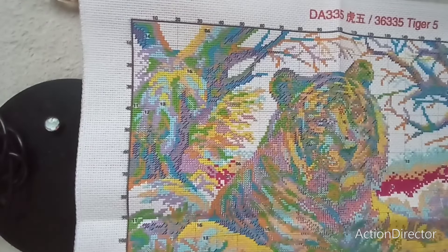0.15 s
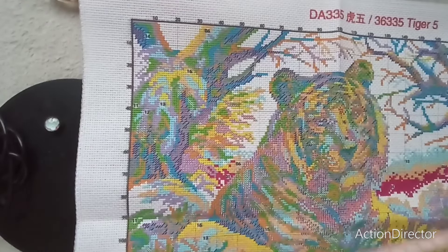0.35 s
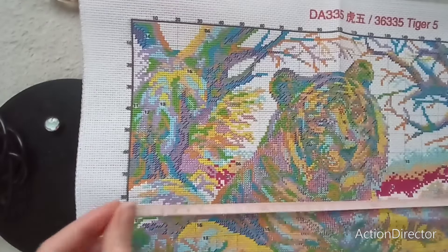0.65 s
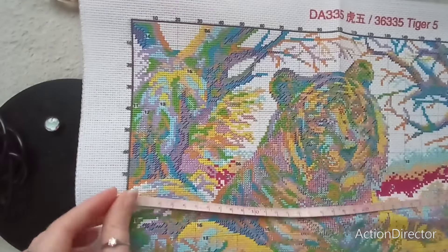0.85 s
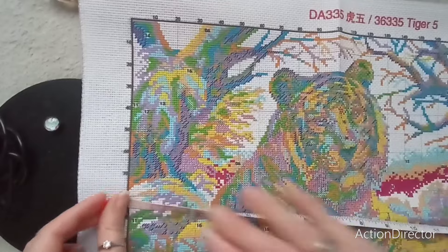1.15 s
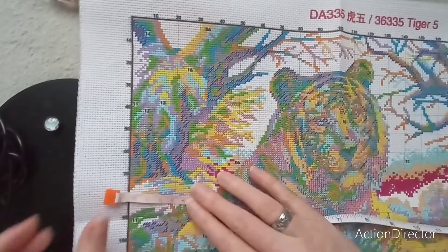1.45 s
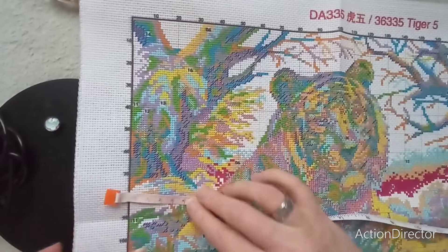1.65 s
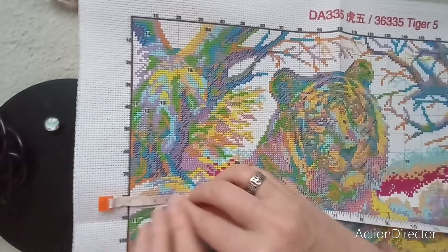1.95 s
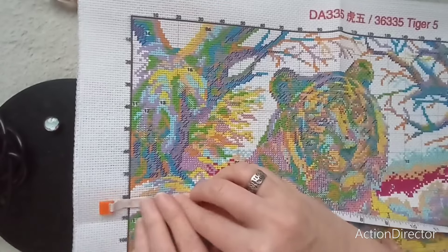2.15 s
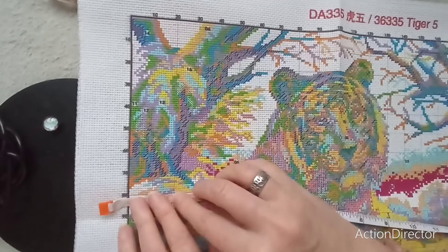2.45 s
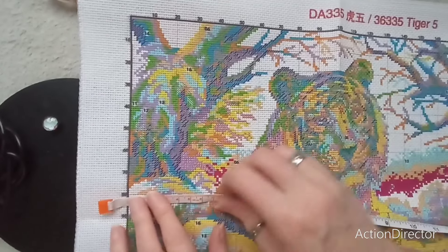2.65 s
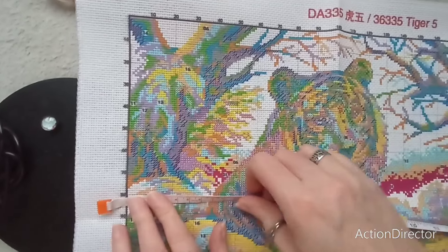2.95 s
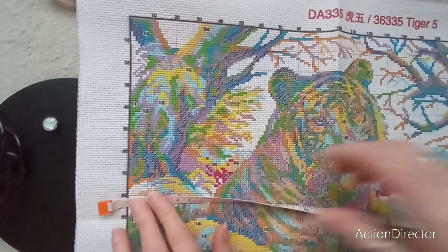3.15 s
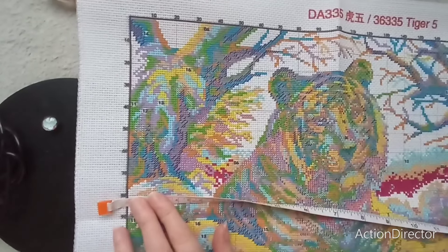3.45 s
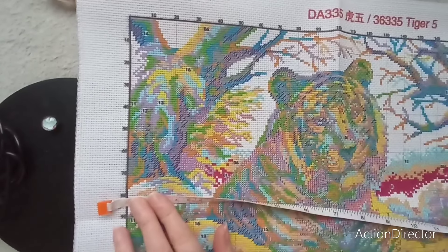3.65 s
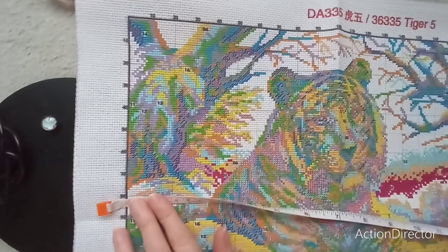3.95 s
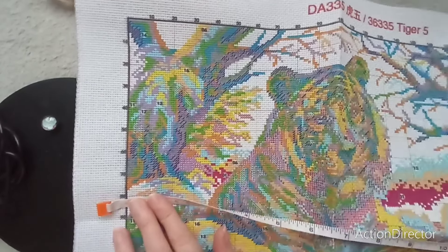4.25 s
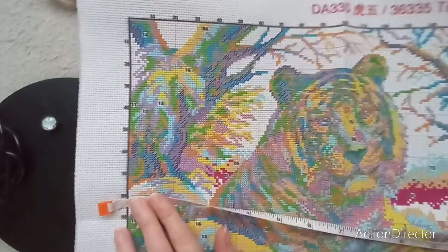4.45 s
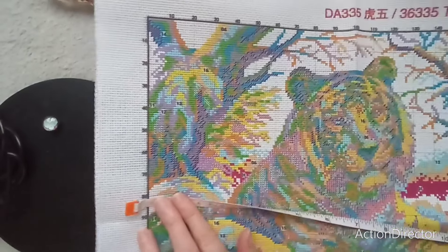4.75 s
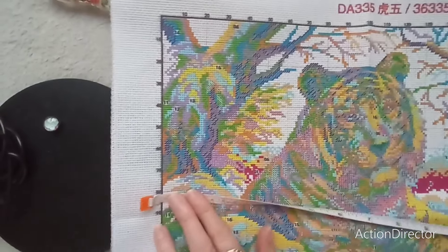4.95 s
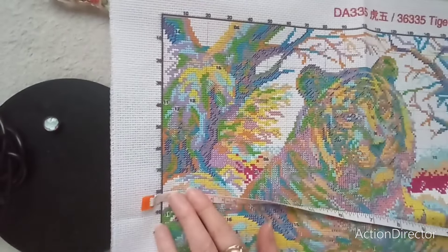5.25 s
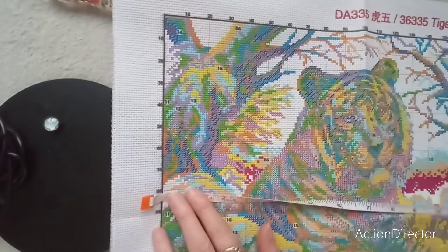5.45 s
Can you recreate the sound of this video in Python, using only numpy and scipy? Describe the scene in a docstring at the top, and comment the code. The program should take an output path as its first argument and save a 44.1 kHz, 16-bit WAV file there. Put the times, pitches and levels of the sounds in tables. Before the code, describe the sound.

Close to a stereo microphone in a small quiet room, a flexible tape measure is pulled out at the right, hissing and cracking sharply for half a second. Soft finger pats and a click follow as it lands on stiff canvas, then faint rubbing. After a near-quiet stretch come more pats, a brief rasping drag, a hard knock at the left and a few last dry clicks.

```python
"""Tape measure on embroidery canvas

A small quiet room, close to a camera with two microphones. A plastic tape is drawn out at the right:
friction hiss, with a damped flap and a cracking burst as each kink flips. It is laid on stiff canvas on
a table, where fingers pat (damped modes), smooth, scrape and drag (filtered random slips), threads click
and tick (short noise bursts), and something small and hard knocks at the left. Low rumble and hiss lie
beneath, and decaying noise gives the room's answer."""
import sys
import numpy as np
from scipy import signal
from scipy.fft import rfft, irfft, next_fast_len
from scipy.io import wavfile
from scipy.ndimage import uniform_filter1d, map_coordinates

SR = 44100
rng = np.random.default_rng(int(sys.argv[2]) if len(sys.argv) > 2 else 0)


def materialize(psi):
    """Save the field psi as 16-bit PCM at rate SR to the path in sys.argv[1].

    A 1-D psi becomes a single channel; in a 2-D psi each row is a channel.
    """
    bounded = np.clip(np.atleast_2d(psi).T, -1, 1)
    quanta = np.round(bounded * 32767).astype(np.int16)
    wavfile.write(sys.argv[1], SR, quanta)


N = 246519

# All levels are relative; spectra are densities per Hz.
# Room tone. Each row: frequency in Hz, level in dB.
ROOM_TONE_SPECTRUM = [(25, -21), (45, -18), (85, -0.5), (200, 1.5), (400, -5.5), (800, -13), (2000, -18.5),
                      (3400, -20), (3900, -25), (9500, -31), (11300, -29), (12050, -14), (12700, -25.5),
                      (15000, -26)]
# Left-right likeness of the room tone. Each row: frequency in Hz, correlation from 0 to 1.
ROOM_TONE_LIKENESS = [(60, 0.38), (300, 0.31), (900, 0.061), (2000, 0)]
# Decay of the room. Each row: frequency in Hz, time to fall 60 dB in seconds.
ROOM_DECAY = [(150, 0.27), (1000, 0.29), (5000, 0.32), (14000, 0.22)]
# The camera's body shading sound from the right. Each row: frequency in Hz, left-right difference in dB.
RIGHT_SHADE = [(200, -4.5), (700, -4), (1300, -11.5), (2400, -3.5), (4400, -5), (8000, -16.5),
               (10500, -1.5), (12500, 7.5), (15000, -7)]
# Where the hands work. Each row: time in seconds, left-right difference in dB.
HAND_PLACES = [(1.05, -4.5), (1.398, 2), (2.7, 2.5), (3.602, -6.5), (4.3, -4.5), (4.9, 0), (5.5, -6)]

# Something small and hard knocking at the left. Each row: start in seconds, level in dB.
KNOCKS = [(4.6047, -25.5), (4.631, -10.5), (4.668, -26.5)]
# Spectrum of its click and rattle. Each row: frequency in Hz, level in dB.
KNOCK_SPECTRUM = [(120, -26), (550, 0), (1000, 6), (1200, -1.5), (1420, 2), (1950, -8.5), (3200, -1),
                  (4800, -12), (9500, -47), (12500, -2.5), (15000, -14.5)]
# Single threads slipping off a nail. Each row: start in seconds, level in dB.
THREAD_TICKS = [(0.142, -19.5), (1.785, -29), (1.806, -30), (2.0814, -28), (3.5535, -28.5)]
# Spectrum of these ticks. Each row: frequency in Hz, level in dB.
TICK_SPECTRUM = [(1500, -18), (9500, -11.5), (12500, 5.5), (15500, 1)]
# Stiff threads and tape edges clicking by themselves. Each row: start in seconds, level in dB.
CRINKLES = [(0.1335, -25), (5.1927, -33), (5.206, -23), (5.5317, -25.5), (5.545, -23.5)]
# Spectrum of these clicks. Each row: frequency in Hz, level in dB.
CLICK_SPECTRUM = [(300, 9), (1200, -7.5), (3500, 5), (7000, 7), (9500, 0), (12500, 3.5), (15500, -21)]
# A nail scraping across the weave. Each row: middle in seconds, half length in seconds, level in dB.
SCRAPES = [(1.064, .002, -49), (1.79, .007, -54), (1.807, 0.0045, -52), (1.925, 0.033, -66),
           (2.217, 0.009, -53), (2.692, 0.052, -61.5), (4.386, 0.0028, -46.5)]
# Spectrum of the scrapes. Each row: frequency in Hz, level in dB.
SCRAPE_SPECTRUM = [(200, 2), (600, 0), (1050, 0), (1700, -6), (2600, -5), (5000, -15.5), (15000, -8.5)]

# Fingers and tape landing. Each row: start in seconds, pat in dB, pitch in Hz, click in dB.
TAPS = [(0.7817, -50, 233, -32.5), (0.872, -37, 260, -32.5), (.935, -42.5, 213, -54),
        (1.055, -41, 310, -36), (1.064, -46, 370, -52), (1.0717, -36, 104, -19.5), (1.083, -48, 330, -58),
        (1.1, -46, 260, -40), (1.403, -47, 212, -47), (3.8358, -40, 275, -36), (3.853, -46, 290, -44),
        (3.995, -40, 328, -51), (4.099, -36.5, 265, -46), (5.2007, -38.5, 232, -26.5),
        (5.2154, -40.5, 245, -41), (5.4425, -45, 282, -35), (5.467, -43, 168, -49), (5.511, -41, 219, -33),
        (5.5382, -43, 165, -26.5)]
# Modes of the patted table. Each row: multiple of the pitch, level in dB, cycles to fall 60 dB.
TABLE_MODES = [(1.04, 6, 4.7), (0.64, -34, 4), (1.8, -18, 9.5), (2.9, -8, 3.2)]
# Short strokes of a hand over the canvas.
# Each row: middle in seconds, half length in seconds, level in dB, firmness in dB.
STROKES = [(0.793, 0.015, -64, -8), (0.882, 0.017, -63, 6), (1.09, .013, -61, -8), (1.138, 0.036, -66.5, 4),
           (1.478, 0.048, -72, -4), (1.803, 0.019, -59, 1.5), (1.876, 0.22, -67.5, 3.5),
           (2.264, 0.029, -62, 0), (2.691, 0.11, -63, 5), (3.893, 0.014, -58.5, 12.5),
           (4.372, 0.029, -56, -3.5), (5.024, 0.048, -58.5, 0), (5.535, 0.041, -66, -11.5)]
# One long slide of the hand along the tape. Each row: time in seconds, level in dB, firmness in dB.
SWEEP = [(3.84, -72.5, -8.5), (3.93, -64.5, 3), (3.99, -58.5, -2), (4.15, -65, -1.5), (4.31, -57, -1.5),
         (4.45, -73.5, -11.5), (4.56, -65.5, -3), (4.63, -60.5, -2.5), (4.74, -62.5, 2),
         (5.179, -74.5, -9.5)]
# The sheet flexing under the hand. Each row: frequency in Hz, level in dB.
FLEX_SPECTRUM = [(35, -23), (85, -1), (210, 8), (320, 4.5), (480, -10.5), (900, -28), (2000, -65)]
# Skin rubbing the canvas. Each row: frequency in Hz, level in dB.
RUB_SPECTRUM = [(170, -20), (330, -1.5), (620, 5), (850, 1), (1200, 0.5), (2000, -9), (2800, -6.5),
                (5000, -38), (10000, -42)]
# Starched threads fizzing. Each row: frequency in Hz, level in dB.
FIZZ_SPECTRUM = [(1000, -4.5), (3000, 2.5), (6500, 0), (9500, -4), (11000, -3), (12200, 5), (15000, -5)]

# The tape dragged over the weave. Each row: start in seconds, length in seconds, final level in dB.
DRAGS = [(4.19, 0.021, -49), (4.214, 0.1, -40.5), (5.206, 0.0065, -39.5), (5.49, 0.022, -58)]
# Rasp of the dragged edge. Each row: frequency in Hz, level in dB.
DRAG_SPECTRUM = [(400, -13), (1000, -21), (1900, -9), (2800, -0.5), (4400, -6.5), (6200, -3.5), (8500, -16),
                 (12500, -18), (15000, -26)]
# Hiss of the tape running out. Each row: time in seconds, level in dB.
PULL = [(0, -62), (.174, -47), (.178, -33), (.27, -37), (.325, -30.5), (.4, -41), (.47, -53), (.6, -53),
        (.63, -84), (.68, -101)]
# Spectrum of that hiss. Each row: frequency in Hz, level in dB.
HISS_SPECTRUM = [(350, -65), (1400, -0.5), (2200, -6), (4200, -5), (6800, 2.5), (8500, 0.5), (10500, -3),
                 (12500, 1.5), (15000, -5.5)]
# Kinks flipping in the tape. Each row: start in seconds, flap in dB, crack in dB, pitch in Hz.
KINKS = [(0.0384, -24, -23.5, 844), (.1332, -28.5, -24, 910), (0.1517, -27.5, -34, 900),
         (0.2168, -26.5, -39, 860), (0.2418, -26, -31, 745), (.2665, -25, -22, 890),
         (0.2912, -22, -11, 940), (0.312, -21, -19, 910), (0.3487, -31, -10, 1080),
         (0.3682, -21.5, -17, 1040), (0.3791, -23, -5.5, 1075), (0.4102, -21.5, -3, 990),
         (0.4126, -25.5, -2.5, 1050), (0.4311, -20, -9, 1030), (0.4462, -25, -3, 1020),
         (0.451, -20.5, -6, 1066), (0.493, -29, -2.5, 1010), (0.4961, -28, -4, 1040),
         (0.5622, -48, -7, 1195), (.721, -63, -27, 1090), (3.5621, -68, -31.5, 945), (3.615, -55, -39, 900),
         (3.6198, -52, -34.5, 1000)]
# Modes of a flap of the tape. Each row: multiple of the pitch, level in dB, cycles to fall 60 dB.
FLAP_MODES = [(1, 1, 15), (1.55, 1, 13.8), (2.3, -10.5, 18)]
# Modes of a crack. Each row: multiple of the kink's pitch, level in dB, cycles to fall 60 dB.
SNAP_MODES = [(1.6, -8.5, 14.5), (2.42, 0.5, 19.6), (4.6, -3, 24), (6.4, -8, 18)]
# Spectrum of the cracks and of the crackling edge. Each row: frequency in Hz, level in dB.
CRACK_SPECTRUM = [(450, -39), (900, -1), (1200, -6), (1650, 1), (2050, 1), (2480, 3.5), (2900, 4),
                  (3700, 0.5), (4600, 0.5), (6400, -2), (9500, -9), (12800, -6), (15500, -13)]
# The tape tips onto its crackling edge. A single row: middle in seconds, half length in seconds, level in dB.
EDGE = (0.39, 0.12, -44.5)

TOP_HZ = 15700  # band limit of the microphones' camera
THUD_HZ, THUD_DB = 312, -24  # the table gives under a knock
RATTLE_DB, RATTLE_T60_S = -32, 0.061  # and the knocked thing chatters
SETTLE_S, SETTLE_DB, SETTLE_PITCH = 0.01636, -11.5, 0.73  # the fingertip flattens: delay, drop, pitch ratio
# every landing also brushes the weave
BRUSH_LAG_S, BRUSH_HALF_S, BRUSH_DB, BRUSH_FIRMNESS_DB = 0.0084, 0.014, -17, 6
USUAL_HALF_S = 0.02  # half length of an ordinary stroke
DRAG_ATTACK_S, DRAG_BUILD_DB_PER_S, DRAG_STOP_DB_PER_S = 0.0024, 60, 1100
KINK_SCATTER = 0.025  # share by which a kink's modes stray from their pitch
FLAP_ATTACK_S = 0.00053
SNAP_DB = -22.5  # added to a kink's crack level for its ringing modes
FLUTTER_COUNT, FLUTTER_RANGE_DB = 28, 9  # small flaps of the running tape, and their spread
FLUTTER_DB, FLUTTER_FOLLOWS = -22, 0.34  # level of the strongest at 0 dB of hiss; dB gained per dB of hiss
FLUTTER_HZ, FLUTTER_OCTAVES = 956, 0.73  # middle pitch, and its spread


def amp(db):
    """Decibels to gain."""
    return 10 ** (np.asarray(db) / 20)


def unit(x):
    """Scale to rms 1."""
    return x / np.sqrt(np.mean(x ** 2) + 1e-20)


def along(points, hz):
    """Interpolate (Hz, value) points on a log frequency axis."""
    f, v = np.transpose(points)
    return np.interp(np.log(hz + 1), np.log(f + 1), v)


def wander(knots_per_s):
    """A smooth random curve through normal draws at the given rate."""
    knots = np.arange(N) * knots_per_s / SR
    return map_coordinates(rng.standard_normal(N // 20), [knots])


def envelope(curve):
    """Gain per sample from an (s, dB) curve, silent outside it, slightly smoothed."""
    s, db = np.transpose(curve)
    gain = np.interp(np.arange(N) / SR, s, amp(db), left=0, right=0)
    return np.abs(uniform_filter1d(gain, size=128))  # abs: rounding must not go below zero


def swell(middle_s, half_s, db):
    """Gain per sample of one movement that swells and fades."""
    away = np.minimum(((np.arange(N) / SR - middle_s) / half_s) ** 2, 20)
    return amp(db) * np.exp(-.75 * away)


def filtered(x, response):
    """x times a complex response of frequency."""
    n = x.shape[-1]
    m = next_fast_len(n + SR // 10)
    return irfft(rfft(x, m) * response(np.fft.rfftfreq(m, 1 / SR)), m)[..., :n]


def high_pass(x, corner_hz):
    """Causal second-order roll-off below the corner."""
    return filtered(x, lambda hz: -hz ** 2 / (corner_hz ** 2 - hz ** 2 + 1j * hz * corner_hz))


def coloured(x, spectrum):
    """Causal minimum-phase filter with the given spectrum, so that attacks stay sharp."""
    size = 4096
    cepstrum = irfft(np.log(amp(along(spectrum, np.fft.rfftfreq(size, 1 / SR)))))
    # fold the cepstrum onto positive time
    cepstrum[1:size // 2] *= 2
    cepstrum[size // 2 + 1:] = 0
    kernel = irfft(np.exp(rfft(cepstrum)))
    kernel /= np.linalg.norm(kernel)
    return signal.fftconvolve(x, np.atleast_2d(kernel), axes=1)[:, :N]


def add(track, s, sound):
    """Mix a short sound into a track at s seconds."""
    part = track[..., round(s * SR):][..., :sound.shape[-1]]
    part += sound[..., :part.shape[-1]]


def panned(left_db):
    """Gains of the two microphones for a left-right level difference."""
    left_db = np.atleast_1d(left_db)
    g = amp(np.array([left_db, -left_db]) / 2)
    return g / g.mean(0)


def at_hands(x):
    """Place a sound where the hands are working."""
    return x * panned(np.interp(np.arange(N) / SR, *np.transpose(HAND_PLACES)))


def delays(hz, left_s, right_s):
    """Phase response of a separate delay at each microphone."""
    return np.exp(-2j * np.pi * hz * np.array([[left_s], [right_s]]))


def from_right(x, lag_ms):
    """The left microphone hears it later, shaded by the camera's body."""
    return filtered(x, lambda hz: panned(along(RIGHT_SHADE, hz)) * delays(hz, lag_ms / 1000, 0))


def spread(draw, apart):
    """Two channels from three random draws: one shared, one each."""
    apart = np.clip(apart, 0, 1)
    return np.sqrt(1 - apart) * draw[:1] + np.sqrt(apart) * draw[1:]


def friction(spectrum, rate, size_db, clump_db, apart):
    """Threads catch and let go: rate tiny slips a second, uneven in size and coming in clumps; rms 1."""
    happens = rng.random((3, N)) < rate / SR
    sign = rng.choice([-1, 1], (3, N))
    size = amp(size_db * np.clip(rng.standard_normal((3, N)), -2, 2))
    slips = spread(happens * sign * size, apart)
    return unit(coloured(slips * amp(clump_db * wander(110)), spectrum))


def ring(modes, hz, attack, scatter=0.086):
    """A few heavily damped modes, a little different at every blow."""
    t = np.arange(SR // 8) / SR
    total = np.zeros(len(t))
    for ratio, db, cycles in modes:
        stray_db, detune = rng.standard_normal(2)
        mode_hz = hz * ratio
        decay = amp(db + stray_db - 60 * t * mode_hz / cycles)
        total += decay * np.sin(2 * np.pi * mode_hz * (1 + scatter * detune) * t)
    return total * (1 - np.exp(-t / attack))


def burst(t60, apart, snap):
    """One abrupt snap and a crackle of a few milliseconds, in two channels; energy 1."""
    t = np.arange(SR // 20) / SR
    crackle = spread(rng.standard_normal((3, len(t))), apart) * amp(-60 * t / t60)
    crackle[:, 0] = snap * np.linalg.norm(crackle, axis=1)  # the snap is the first sample
    return crackle / np.linalg.norm(crackle, axis=1, keepdims=True)


def background():
    """Low room rumble and the microphones' own hiss, partly alike at left and right."""
    def middle_and_side(hz):
        turn = np.arccos(np.clip(along(ROOM_TONE_LIKENESS, hz), -1, 1)) / 2
        return amp(along(ROOM_TONE_SPECTRUM, hz)) * np.array([np.cos(turn), np.sin(turn)])
    mid, side = filtered(rng.standard_normal((2, N)), middle_and_side)
    return amp(-62.0) * unit(np.array([mid + side, mid - side]))


def room(x):
    """The walls answer after a short gap; the decay time depends on frequency, shortest at the very top."""
    hz, t, z = signal.stft(rng.standard_normal((2, SR // 2)), SR, nperseg=256)
    decay = amp(-60 * t / along(ROOM_DECAY, hz)[:, None])
    tail = signal.istft(z * decay, SR, nperseg=256)[1]
    tail *= np.clip((np.arange(tail.shape[1]) / SR - .007) / 0.0024, 0, 1)  # 7 ms gap, then a quick rise
    return signal.fftconvolve(x, tail / np.linalg.norm(tail[0]), axes=1)[:, :N]


def knocks():
    """A hard contact gives a woody click, a thud and a brief rattle; it reaches the left microphone first."""
    blows, thuds, rattling = np.zeros((2, N)), np.zeros(N), np.zeros(N)
    t = np.arange(SR // 4) / SR
    for s, db in KNOCKS:
        add(blows, s, amp(db) * panned(3.6))
        add(thuds, s, amp(db + THUD_DB) * ring(TABLE_MODES, THUD_HZ, attack=0.0013))
        add(rattling, s, amp(db + RATTLE_DB - 60 * t / RATTLE_T60_S))
    rattle = rattling * friction(KNOCK_SPECTRUM, rate=290, size_db=8, clump_db=6.0, apart=0.6)
    return filtered(coloured(blows, KNOCK_SPECTRUM) + thuds + rattle, lambda hz: delays(hz, 0, .00017))


def thread_ticks():
    """A single thread slips off a nail with a thin, high tick."""
    ticks = np.zeros((2, N))
    for s, db in THREAD_TICKS:
        add(ticks, s, amp(db) * burst(t60=0.022, apart=0.85, snap=0.3))
    return at_hands(coloured(ticks, TICK_SPECTRUM))


def crinkles():
    """Single dry clicks of the stiff cloth and of the tape's edge, alone or under a landing finger."""
    clicks = np.zeros((2, N))
    landings = [(s, click_db) for s, _, _, click_db in TAPS]
    for s, db in list(CRINKLES) + landings:
        add(clicks, s, amp(db + 3.0) * burst(t60=0.015, apart=0.97, snap=0.52))
    return at_hands(coloured(clicks, CLICK_SPECTRUM))


def scrapes():
    """A nail skips over a few threads with a coarse, hollow rasp."""
    rasp = friction(SCRAPE_SPECTRUM, rate=1200, size_db=2, clump_db=5.5, apart=0.56)
    return at_hands(sum(swell(*row) for row in SCRAPES) * rasp)


def taps():
    """Soft pats on the padded table, each settling once: broad contacts sound low, small ones high."""
    pats = np.zeros((2, N))
    for s, db, hz, _ in TAPS:
        for delay, drop_db, pitch in [(0, 0, hz), (SETTLE_S, SETTLE_DB, hz * SETTLE_PITCH)]:
            pat = ring(TABLE_MODES, pitch, attack=.35 / pitch)
            add(pats, s + delay, amp(db + drop_db - 0.5) * pat)
    return high_pass(pats, corner_hz=70.4)


def stroke_envelope(firm_slope, long_db):
    """Hand movements as gain: firm_slope dB per dB of firmness, long_db per doubling of stroke length."""
    brushes = [(s + BRUSH_LAG_S, BRUSH_HALF_S, min(db, click_db) + BRUSH_DB, BRUSH_FIRMNESS_DB)
               for s, db, _, click_db in TAPS]
    strokes = np.zeros(N)
    for s, half_s, db, firmness in list(STROKES) + brushes:
        length_db = long_db * np.log2(half_s / USUAL_HALF_S)
        strokes += swell(s, half_s, db + firm_slope * firmness + length_db)
    sweep = envelope([(s, db + firm_slope * firmness) for s, db, firmness in SWEEP])
    return np.hypot(strokes, sweep)


def smoothing():
    """Under a hand the sheet flexes (firm hand), skin rubs (long stroke), starched threads fizz (light hand)."""
    flex = friction(FLEX_SPECTRUM, rate=900, size_db=1.0, clump_db=4.0, apart=0.13)
    flex *= amp(-3.0) * stroke_envelope(firm_slope=0.75, long_db=1.0)
    rub = friction(RUB_SPECTRUM, rate=900, size_db=3.5, clump_db=3.5, apart=0.76)
    rub *= amp(-5.0) * stroke_envelope(firm_slope=0.54, long_db=1.0)
    fizz = friction(FIZZ_SPECTRUM, rate=4200, size_db=5.0, clump_db=1.5, apart=1.0)
    fizz *= amp(-0.65) * stroke_envelope(firm_slope=-1.06, long_db=0.5)
    uneven = amp(0.92 * wander(35))  # the hand catches and hurries
    return uneven * (flex + at_hands(rub + fizz))


def drag_envelope(start_s, length_s, db):
    """A drag catches, builds as the tape gathers speed, and stops quickly."""
    t = np.arange(N) / SR - start_s
    build_db = DRAG_BUILD_DB_PER_S * np.maximum(length_s - t, 0)
    stop_db = DRAG_STOP_DB_PER_S * np.maximum(t - length_s, 0)
    return np.clip(t / DRAG_ATTACK_S, 0, 1) * amp(db - build_db - stop_db)


def tape_drag():
    """The tape's edge rasps over the weave, at the right."""
    rasp = friction(DRAG_SPECTRUM, rate=4000, size_db=2.0, clump_db=1, apart=1.0)
    rasp *= amp(-3.0) * sum(drag_envelope(*row) for row in DRAGS)
    judder = amp(2.3 * wander(90))  # the edge sticks and slips
    return from_right(judder * rasp, lag_ms=0.337)


def kink_flips():
    """Each kink flips with a hollow flap and a ringing crack at its own pitch; returns tones and crack bursts."""
    tones, cracks = np.zeros((2, N)), np.zeros((2, N))
    for s, flap_db, crack_db, hz in KINKS:
        flap = ring(FLAP_MODES, hz, attack=FLAP_ATTACK_S, scatter=KINK_SCATTER)
        snap = ring(SNAP_MODES, hz, attack=1 / SR, scatter=KINK_SCATTER)
        add(tones, s, amp(flap_db - 2.55) * flap)
        add(tones, s, amp(crack_db + SNAP_DB) * snap)
        add(cracks, s, amp(crack_db - 0.5) * burst(t60=0.013, apart=0.81, snap=0.44))
    return tones, coloured(cracks, CRACK_SPECTRUM)


def flutter(pull):
    """Small flaps of the running tape, one at a random moment in each equal share of the pull."""
    flaps = np.zeros((2, N))
    pull_end_s = PULL[-1][0]
    for k, (late, weak, high) in enumerate(rng.random((FLUTTER_COUNT, 3))):
        s = pull_end_s * (k + late) / FLUTTER_COUNT
        hz = FLUTTER_HZ * 2 ** (FLUTTER_OCTAVES * (high - .5))
        gain = amp(FLUTTER_DB - FLUTTER_RANGE_DB * weak) * pull[round(s * SR)] ** FLUTTER_FOLLOWS
        add(flaps, s, gain * ring(FLAP_MODES, hz, attack=FLAP_ATTACK_S))
    return flaps


def tape_pull():
    """The tape hisses, crackles and flutters through the fingers at the right, its kinks flipping."""
    pull = envelope(PULL)
    kink_tones, cracks = kink_flips()
    flaps = high_pass(kink_tones + flutter(pull), corner_hz=750)  # so narrow a strip radiates no bass
    hiss = pull * amp(-6.0) * friction(HISS_SPECTRUM, rate=1500, size_db=1.0, clump_db=2.0, apart=0.99)
    crackle = swell(*EDGE) * friction(CRACK_SPECTRUM, rate=180, size_db=6, clump_db=3.5, apart=0.47)
    return from_right(flaps + cracks + crackle + hiss, lag_ms=0.426)


def scene():
    """All the handling, with the room's answer and the room tone."""
    dry = knocks() + thread_ticks() + crinkles() + scrapes() + taps() + smoothing() + tape_drag() + tape_pull()
    return background() + amp(-12.5) * room(dry) + dry


def record(dry):
    """The small microphones lose the deep bass, and the camera keeps nothing above its band limit."""
    return filtered(high_pass(dry, corner_hz=55.0), lambda hz: hz < TOP_HZ)


dry = scene()
out = record(dry)
materialize(out)
```